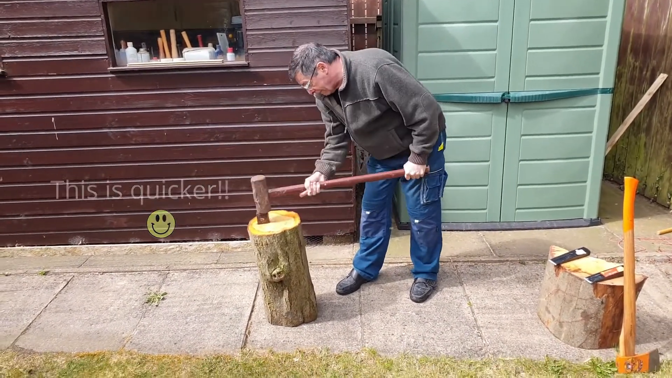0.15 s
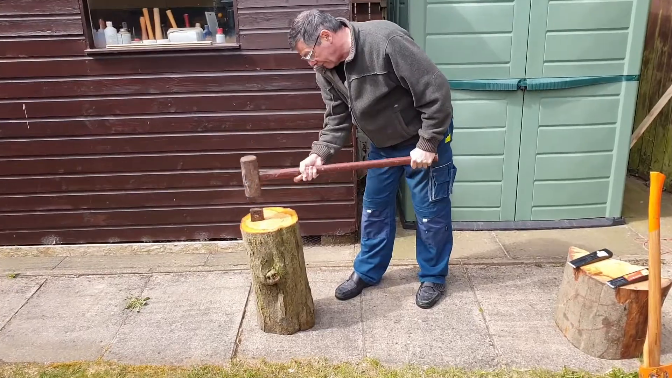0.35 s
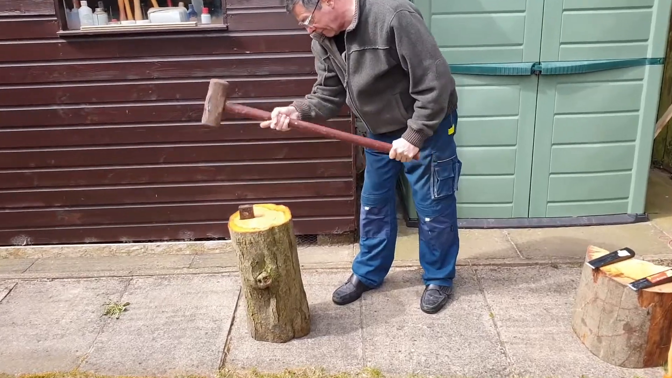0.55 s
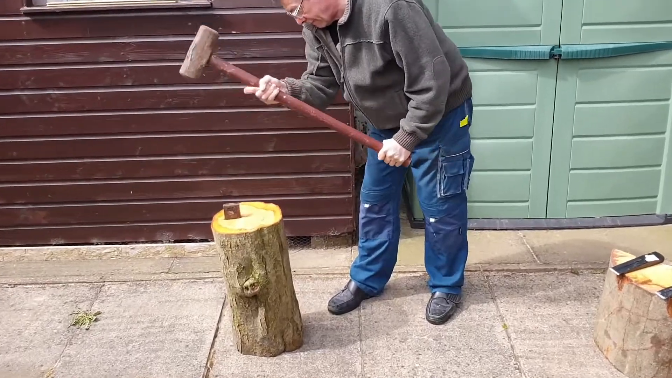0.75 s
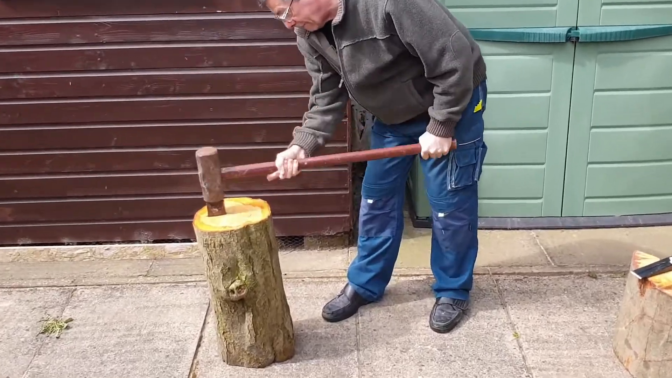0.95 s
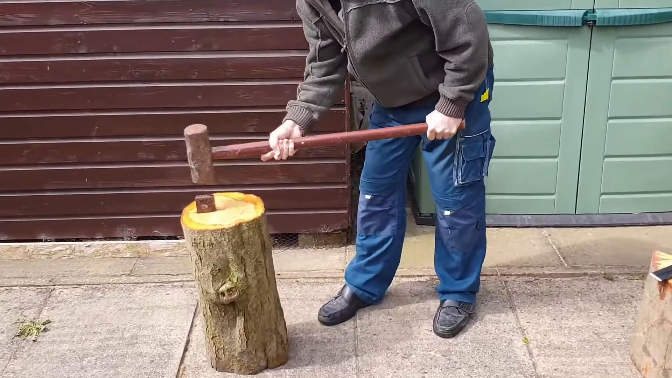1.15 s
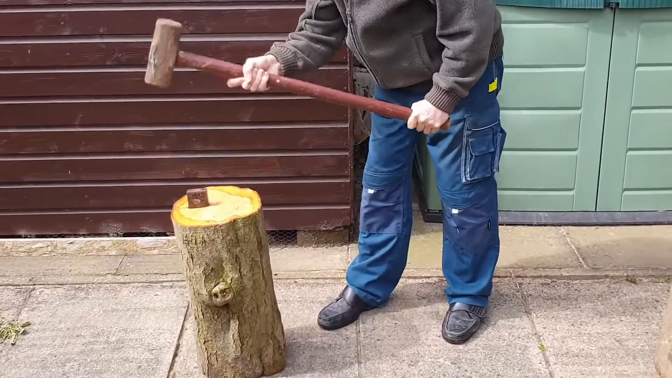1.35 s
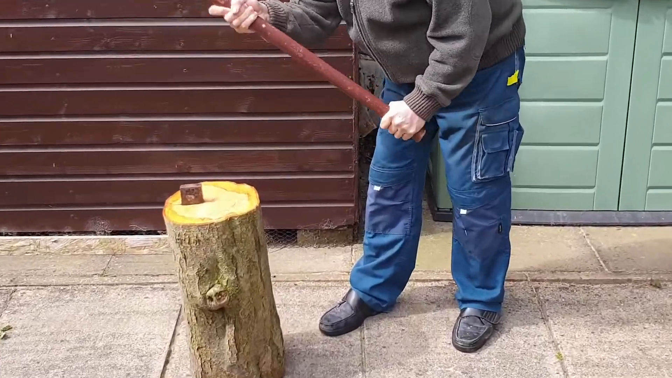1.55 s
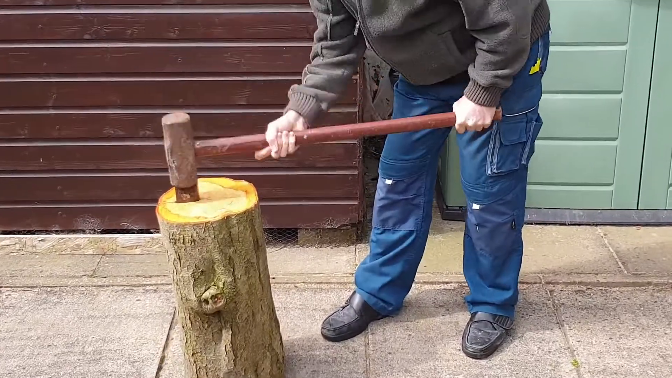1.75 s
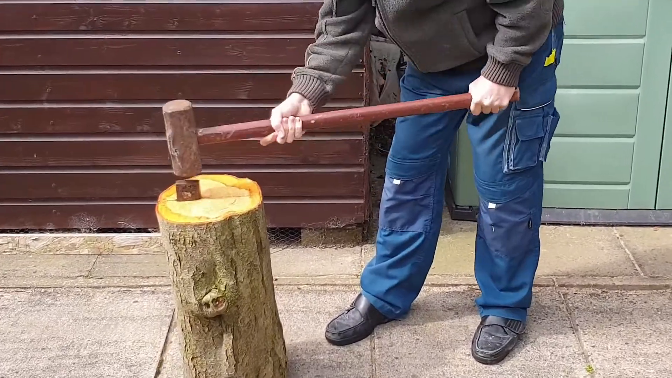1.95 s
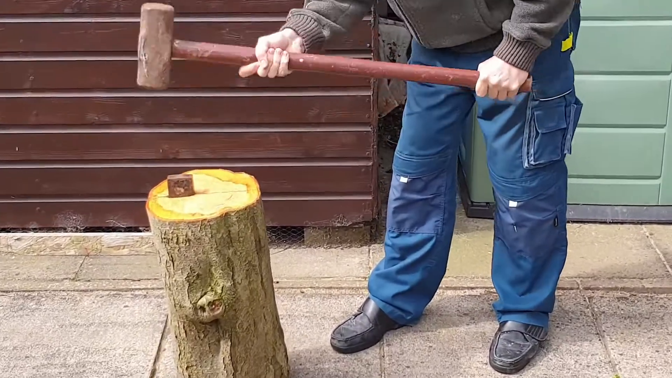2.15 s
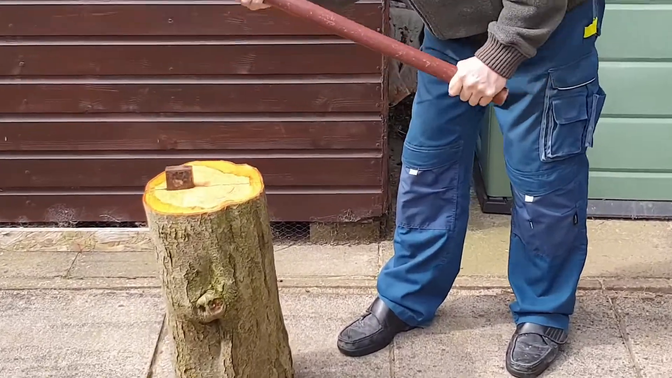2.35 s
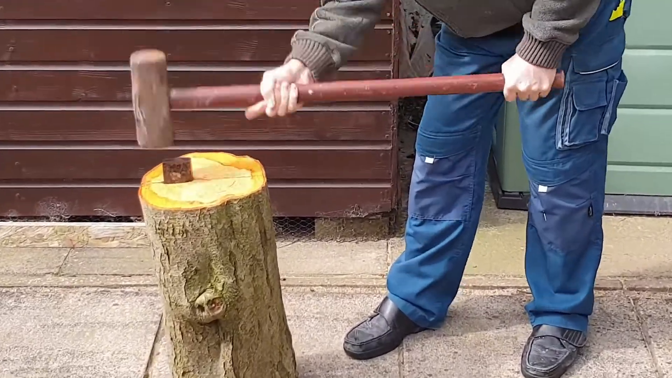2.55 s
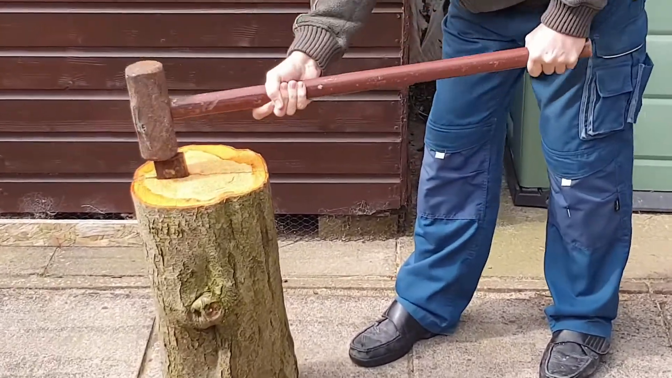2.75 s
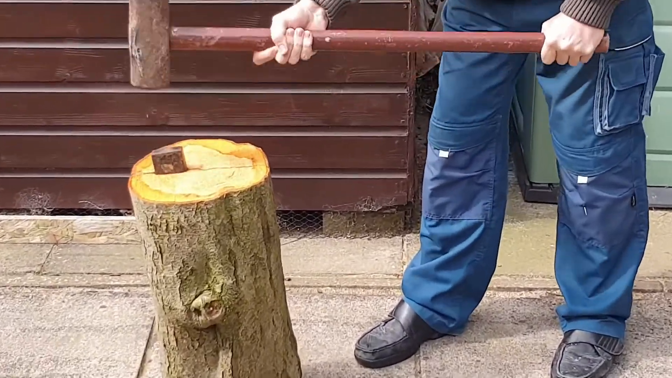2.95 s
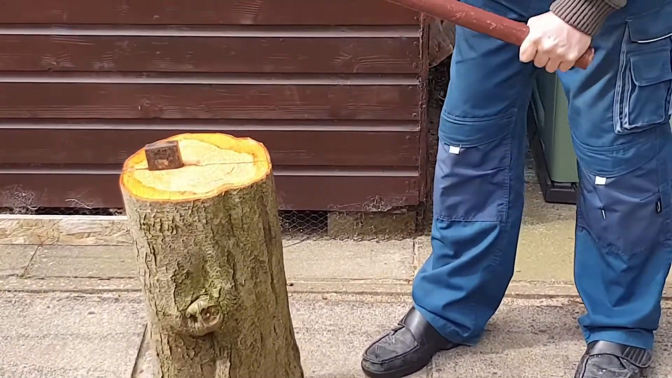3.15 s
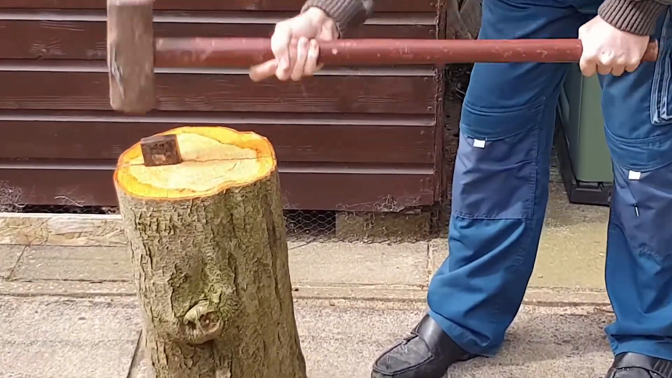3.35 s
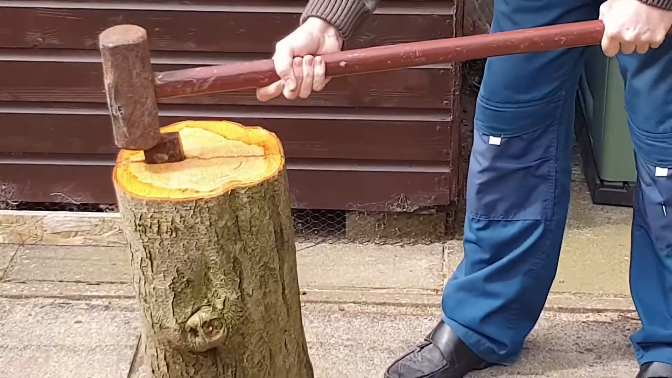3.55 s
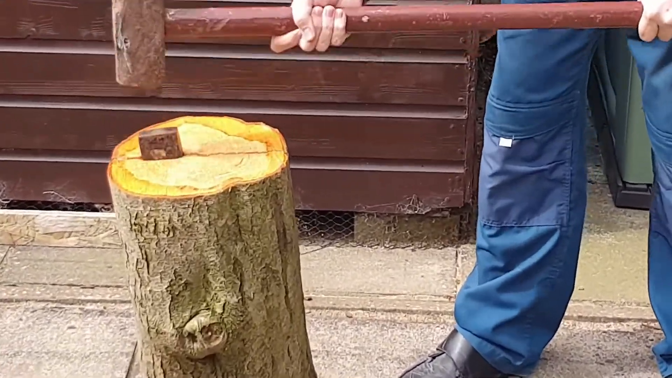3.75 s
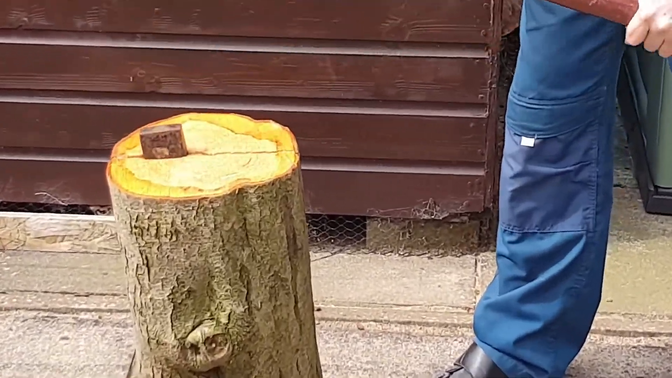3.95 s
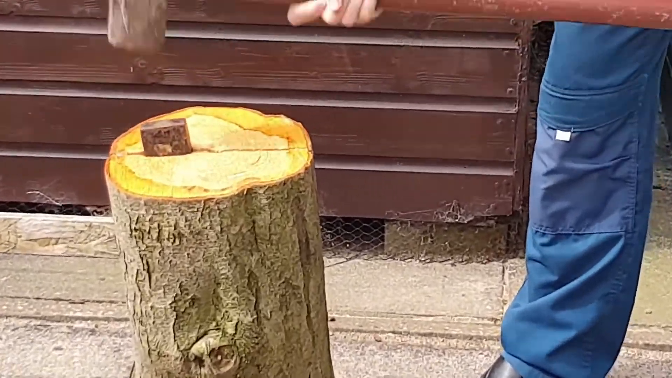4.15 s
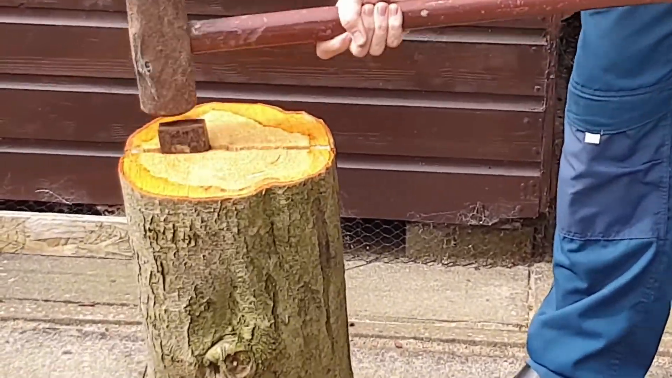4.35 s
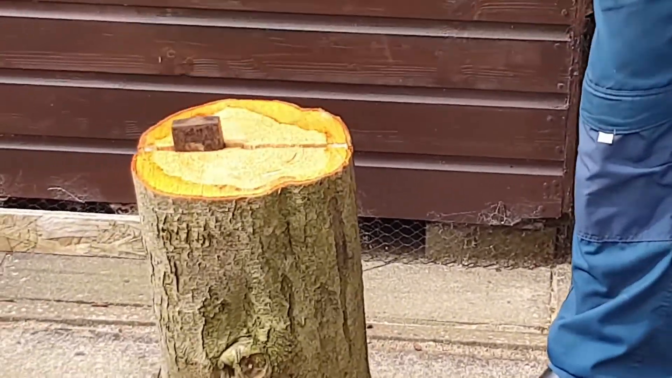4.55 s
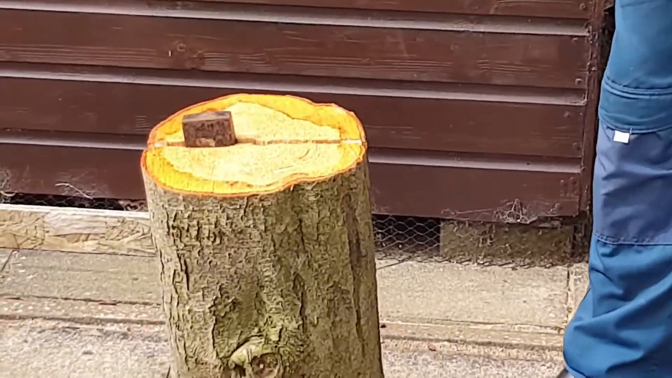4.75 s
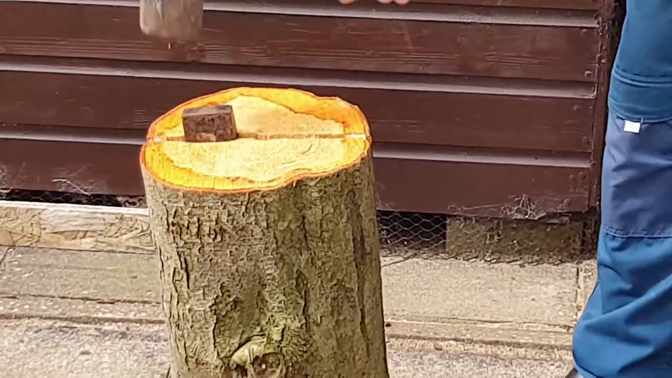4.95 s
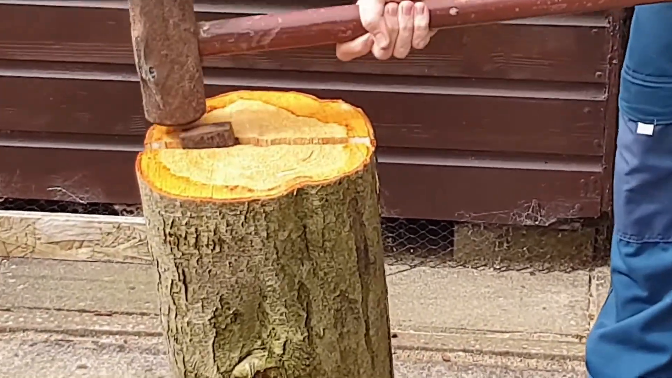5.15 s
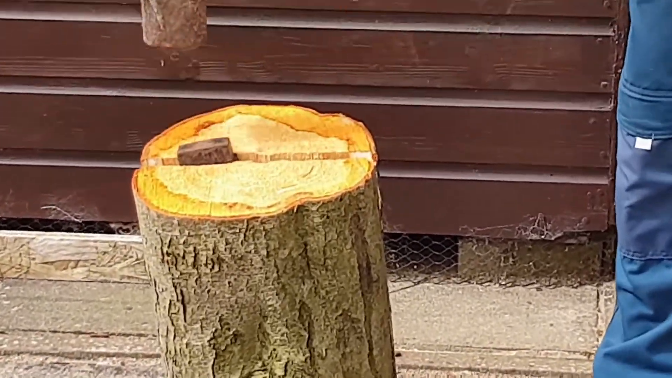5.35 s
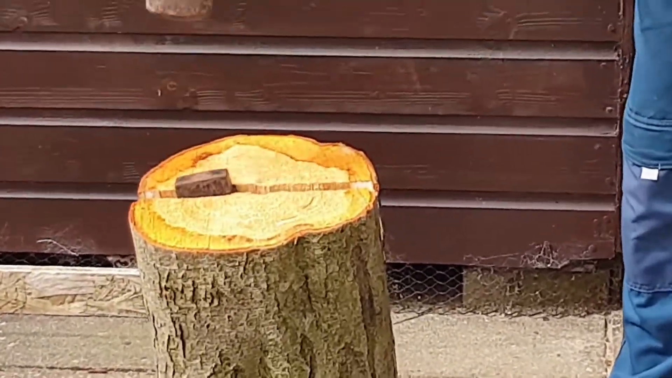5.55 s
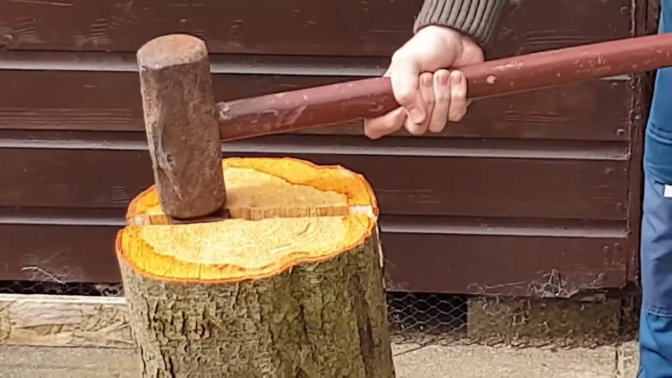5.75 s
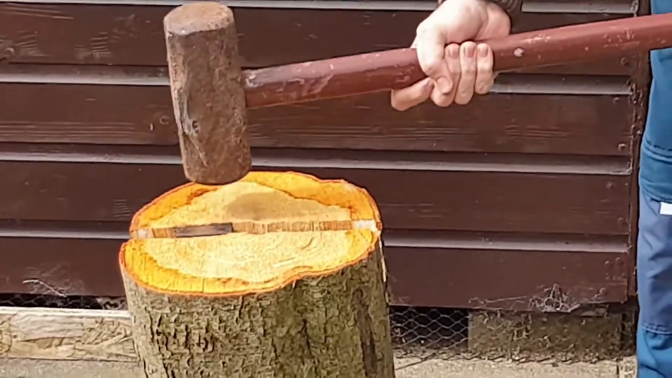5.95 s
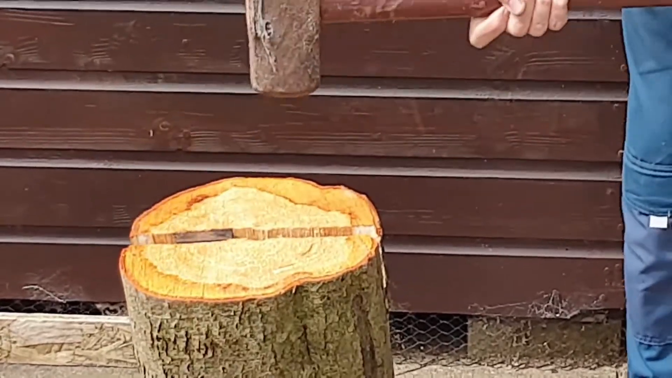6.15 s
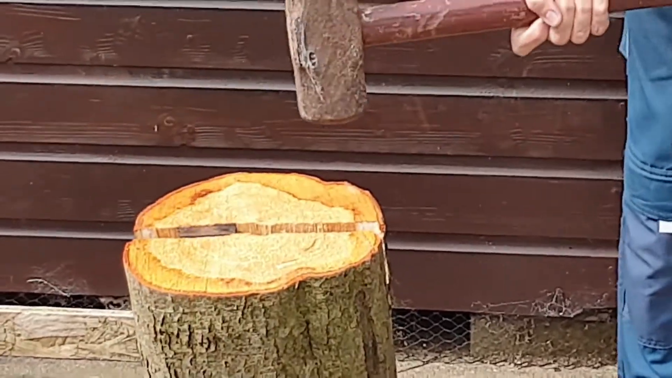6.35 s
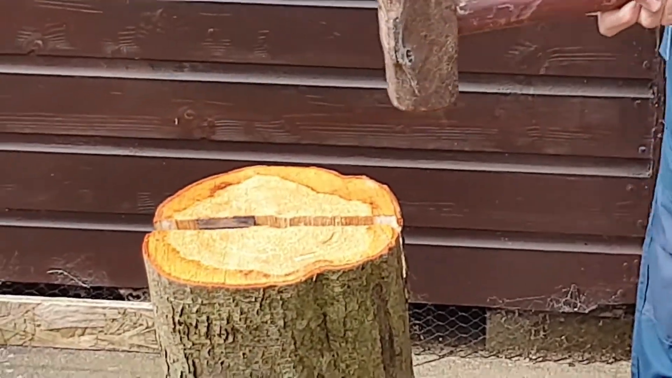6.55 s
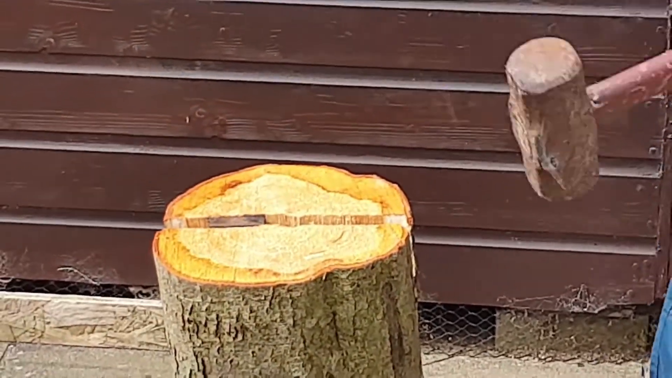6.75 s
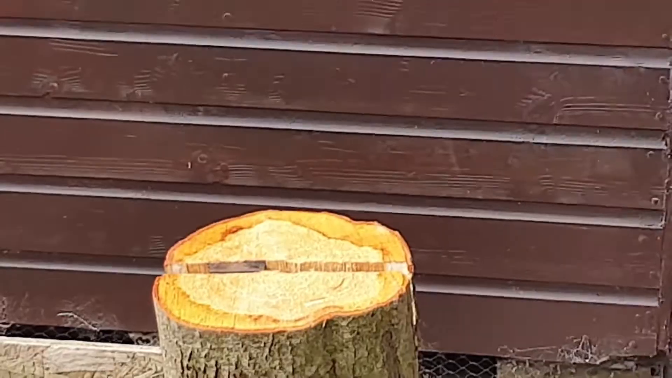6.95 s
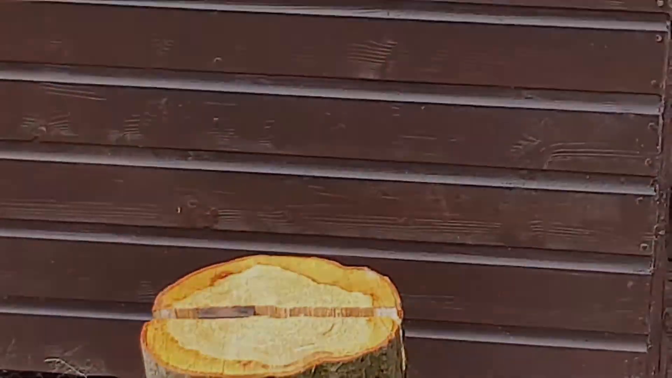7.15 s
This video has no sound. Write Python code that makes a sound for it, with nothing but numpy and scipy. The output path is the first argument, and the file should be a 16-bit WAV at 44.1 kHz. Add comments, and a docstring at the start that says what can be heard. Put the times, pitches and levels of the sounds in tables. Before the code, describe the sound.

A sledgehammer strikes a steel wedge in an upright log eight times in a paved yard, slightly to the left, at about 0.2, 1.0, 1.9, 2.7, 3.5, 4.3, 5.1 and 5.8 seconds. Each blow is a loud, sharp metallic crack with a wooden thump, a brief high ring and a quick slap off nearby walls. Tiny snaps of wood fibre come between blows from about 3.8 seconds, with a clearer snap at 5.3 as the log splits. The last two blows have less thump, and the loosened wedge rings more brightly. Wind is light at first, then buffets the microphone with low rumbling gusts from about 5.5 seconds to the end. Shoes scuff softly on gritty slabs from about 6.5 seconds until the end, just after 7. Very faint, thin bird whistles come and go in the distance throughout.

```python
"""Splitting a log with a sledgehammer

A sledgehammer drives a steel wedge into an upright log in a paved yard, eight blows. Each blow cracks,
thumps the log and rings the steel; shed walls slap it back. On the last two the log splits and the
loosened wedge rings freely. Wind buffets the microphone, far birds call and shoes scuff."""
import sys
import numpy as np
from scipy import signal
from scipy.fft import rfft, irfft, next_fast_len
from scipy.io import wavfile
from scipy.ndimage import uniform_filter1d

SR = 44100
rng = np.random.default_rng(int(sys.argv[2]) if len(sys.argv) > 2 else 0)


def put_to_file(sound):
    """Save the sound as 16-bit audio at rate SR, in the file named by the first command-line argument."""
    columns = np.atleast_2d(sound).T  # one column per channel
    safe = np.clip(columns, -1, 1)
    whole_steps = np.round(safe * 32767)
    wavfile.write(sys.argv[1], SR, whole_steps.astype(np.int16))


N = 321038
T = np.arange(SR) / SR  # one second: the life of one blow

# The tone of a crack, for blows and snapping wood. Each row: frequency in Hz, gain in dB.
CRACK_TONE = [(240, -31.5), (400, 2.5), (600, -0.5), (760, -3), (1060, -8.5), (1900, -6), (2090, -5),
              (3160, -6), (3810, -4.5), (7510, -9.5), (8900, -13.5), (11400, -11), (12100, -5.5),
              (12900, -10), (15100, -11), (16100, -32)]


def amp(db):
    """Turns decibels into a number to multiply by."""
    return 10 ** (np.asarray(db) / 20)


def unit(x):
    """Scales a signal to an average (rms) level of 1."""
    return x / np.sqrt(np.mean(x ** 2) + 1e-20)


def read(points, hz):
    """Reads between the rows of a table, spacing frequencies by octaves."""
    f, value = np.transpose(points)
    return np.interp(np.log(hz + 1), np.log(f + 1), value)


def add(mix, s, sound):
    """Mixes a stereo sound in, starting at s seconds."""
    part = mix[:, max(round(s * SR), 0):][:, :sound.shape[1]]
    part += sound[:, :part.shape[1]]


def colour(x, db_at):
    """Changes the tone by db_at(hz) decibels, without smearing sound back in time."""
    hz = abs(np.fft.fftfreq(4096, 1 / SR))
    log_gain = np.log(amp(np.maximum(db_at(hz), -100)))
    response = np.exp(np.conj(signal.hilbert(log_gain)))
    taps = np.fft.ifft(response).real[:2048]
    return signal.fftconvolve(x, taps[None], axes=1)[:, :x.shape[1]]


def noise(n, spectrum=None):
    """Stereo noise, partly alike in both ears in the bass."""
    # Each row: frequency in Hz, how alike the ears are from 0 to 1.
    likeness = [(60, 0.41), (300, .65), (700, 0), (1300, 0), (6000, 0.11), (13000, 0.32)]
    size = next_fast_len(n)
    hz = np.fft.rfftfreq(size, 1 / SR)
    left, other = rfft(rng.standard_normal((2, size)))
    same = np.clip(read(likeness, hz), -1, 1)
    right = same * left + np.sqrt(1 - same ** 2) * other
    gain = amp(read(spectrum, hz)) if spectrum else 1
    return unit(irfft(np.array([left, right]) * gain, size)[:, :n])


def swell(s, half_s, db):
    """A smooth rise and fall in level, peaking at s seconds."""
    return amp(db) * np.exp(-((np.arange(N) / SR - s) / half_s) ** 2)


def wander(per_s):
    """A random curve that takes a new turn per_s times a second."""
    knots = np.arange(0, N, SR / per_s)
    return np.interp(np.arange(N), knots, rng.standard_normal(len(knots)))


def air():
    """The faint, slowly shifting hush of the gardens."""
    # Each row: frequency in Hz, relative level in dB.
    hush_tone = [(59, -29.5), (100, -5), (177, -18), (461, -13.5), (1230, -22), (3940, -23), (5770, -26),
                 (7610, -19), (9210, -32), (13200, -28), (16000, -31)]
    return amp(-78 + 1.5 * wander(per_s=8)) * noise(N, hush_tone)


def wind():
    """Air swirls at the microphone; strong gusts flutter higher up and hit the right side harder."""
    # The light wind. Each row: time in seconds, level in dB.
    light_wind = [(0, -63), (.6, -68), (.78, -82.5), (.95, -66.5), (1.35, -67.5), (1.68, -79.5),
                  (2.301, -63.5), (2.619, -71.5), (2.95, -50.5), (3.3, -57.5), (3.432, -71.5),
                  (3.851, -60.5), (4.7, -55), (4.9, -82.5), (5.401, -51), (6.4, -42.5), (6.7, -60),
                  (7.28, -46)]
    # Gusts on top. Each row: peak time and half length in seconds, level in dB, relative flutter in dB.
    gusts = [(1.433, .025, -66, -28), (1.542, 0.016, -68, -32), (2.234, 0.027, -51.5, -35),
             (2.321, .035, -56, -28), (3.292, 0.042, -53.5, -34), (3.731, 0.018, -40, -35),
             (3.803, 0.019, -46.5, -35), (4.224, 0.031, -56, -32), (5.44, 0.027, -43.5, -18),
             (5.529, 0.018, -23.5, -29.5), (5.593, 0.04, -31.5, -25), (5.809, .03, -41.5, -42),
             (6.021, .035, -50, -33), (6.186, 0.033, -31.5, -20), (6.293, 0.034, -37.5, -25),
             (6.374, 0.042, -44.5, -16.5), (6.616, 0.014, -46, -42), (6.824, 0.057, -48, -24),
             (7.058, 0.066, -41.5, -20), (7.17, 0.021, -35.5, -10.5), (7.212, 0.016, -35, -11.5),
             (7.256, 0.024, -32.5, -7)]
    # The wind's three tones. Each row: frequency in Hz, relative level in dB.
    breeze_tone = [(12, -38.5), (20, -8), (60, 3), (87, -4), (143, -11.5), (295, -26.5), (338, -23),
                   (718, -45), (1200, -55), (1560, -84), (2640, -120)]
    buffet_tone = [(12, -17.5), (20, -24), (48, -1), (92, 1), (130, -6.5), (280, -14.5), (376, -16),
                   (412, -16.5), (842, -44), (1600, -89.5), (2080, -81), (3520, -120)]
    flutter_tone = [(200, -31), (330, -2), (450, 1.5), (600, 1), (850, -20), (1300, -37.5), (2500, -53),
                    (5000, -76.5)]
    light_db = np.interp(np.arange(N) / SR, *np.transpose(light_wind)) + 3.1 * wander(per_s=20)
    level = amp(light_db) + sum(swell(s, half_s, db) for s, half_s, db, _ in gusts)
    strong_from_db, strong_range_db = -51.5, 15.5  # where breeze turns into buffeting
    strong = np.clip((20 * np.log10(level) - strong_from_db) / strong_range_db, 0, 1)
    buffet = noise(N, buffet_tone)
    swirls = level * (np.sqrt(1 - strong) * noise(N, breeze_tone) + np.sqrt(strong) * buffet)
    swirls = colour(swirls, lambda hz: read([(20, -3), (45, 1.5), (280, 1.5), (500, -2.5)], hz))
    flutter = sum(swell(s, half_s, db + flutter_db) for s, half_s, db, flutter_db in gusts)
    flutter = flutter * unit(noise(N, flutter_tone) * (0.35 + abs(buffet)))  # big swirls shed small ones
    return (swirls + flutter) * amp(strong * np.array([[-2.5], [2.1]]))


def birds():
    """Thin gliding whistles that pulse quickly, blurred by distance."""
    # Each row: start and length in seconds, first pitch, last pitch and blur width in Hz, level in dB.
    calls = [(0, 0.26, 3650, 3600, 334, -74), (0.022, .13, 7000, 7500, 600, -80),
             (0.697, .32, 6410, 5600, 698, -75), (1.537, 0.24, 7800, 8100, 700, -80),
             (2.133, 0.071, 6400, 6600, 80, -66), (2.378, 0.37, 6796, 7400, 896, -75.5),
             (2.439, 0.12, 3600, 4900, 250, -83), (2.938, 0.22, 6470, 6400, 39.9, -73.5),
             (3.184, .14, 4600, 4400, 90.4, -77), (5.01, 0.077, 5180, 5090, 150, -78.5),
             (5.54, 0.36, 6060, 4640, 712, -75.5), (6.154, 0.56, 5040, 5260, 802, -75.5)]
    out = np.zeros((2, N))
    for s, length, start_hz, end_hz, width_hz, db in calls:
        n = round(length * SR)
        hiss = rng.standard_normal((2, n)) + 1j * rng.standard_normal((2, n))
        blur = signal.sosfilt(signal.butter(2, width_hz / 2, fs=SR, output="sos"), hiss)
        trill = np.sin(2 * np.pi * (rng.uniform(6.6, 9) * np.arange(n) / SR + rng.random()))
        pitch = np.linspace(start_hz, end_hz, n) + .15 * width_hz * trill
        call = (blur * np.exp(2j * np.pi * np.cumsum(pitch) / SR)).real * amp(1.8 * trill)
        add(out, s, amp(db) * unit(call) * signal.windows.tukey(n, .8))
    return out


def hammering():
    """The eight blows and the snapping wood; the log stands a little to the left."""
    # Each row: start in seconds; relative levels in dB of the thump, knock, crack, fizz, yard tail,
    # hammer ring, off-centre ring, loose wedge, hollow wood ring and drop back; low and high clang in Hz.
    blows = [(0.1902, 0, 0, 1.5, -3.5, 1, -16.5, -56, -61, -21.5, -18, 2274, 4097),
             (1.0263, 0, -3.5, 1, 0.5, 3, -13, -53, -59, -34, -20, 1726, 5560),
             (1.8690, 0.5, -1.5, 0, -1, 3.5, -19, -38.5, -53.5, -42, -21, 1498, 6680),
             (2.6792, -1, -1.5, 0.5, -1.5, -0.5, -18.5, -41.5, -58, -52, -24, 1520, 6530),
             (3.4882, -0.5, -1, 0, 0, 1.5, -23, -24, -49.5, -44.5, -24.5, 1964, 6390),
             (4.301, 1, 2, -0.5, -1.5, 0, -15.5, -45, -57.5, -18.5, -27, 1396, 5980),
             (5.0994, -4.5, 1, -3, -4.5, 0.5, -17.5, -26.5, -32.5, -20.5, -28.5, 2170, 4700),
             (5.828, -7.5, -2.5, -3.5, -5, -1.5, -42.5, -28, -38.5, -16.5, -45, 2330, 3860)]
    # Each row: frequency in Hz, how much louder the left ear is in dB.
    left_lift = [(60, -2), (150, 0.04), (300, 1.04), (700, 1.5), (1500, 3.5), (3000, -0.5), (8000, 2),
                 (13000, -1.5)]
    out = np.zeros((2, N))
    for s, *settings in blows:
        add(out, s, blow(*settings))
    out += snaps()
    left = colour(out[:1], lambda hz: .5 * read(left_lift, hz))
    right = colour(out[1:], lambda hz: -.5 * read(left_lift, hz))
    return np.vstack([left, right])


def blow(thump_db, knock_db, crack_db, fizz_db, tail_db, head_db, off_db, wedge_db, hollow_db, drop_db,
         low_hz, high_hz):
    """Steel meets steel: a tick, a clanging crack, the log's thump and the ring of the metal."""
    # The notes each part rings at. Each row: pitch in Hz, relative level in dB, seconds to fade 60 dB.
    log_notes = [(68.7, -5, 0.27), (97.64, -2, 0.35), (118.6, -6, 0.26), (147.4, -15, 0.5), (173, -12, 0.1),
                 (237, -1.5, 0.23), (251.6, -6.5, 0.2), (315.2, -2, 0.12), (345.4, 2, 0.19),
                 (397, -10, 0.083), (425, -16, 0.16)]
    hollow_wood_notes = [(117, -4.5, 0.083), (346.3, -0.5, .15), (437, -8.5, 0.1), (589, -8, 0.097),
                         (671, 2, 0.12), (745, -6, 0.074), (1430, -13.5, 0.064), (2370, -7, 0.08)]  # the log's higher, hollow knock, stronger on some blows
    loose_wedge_notes = [(1429, 0, .22), (2125, -1, .24), (2870, -2, .2), (3835, -2.5, .26),
                         (3886, -4, .29), (3935, -6, .25), (4703, 2, .22), (7000, -3, .2), (7531, -3, .17),
                         (7705, -9, .2), (7750, -6, .24)]
    hammer_notes = [(12010, 0, .19)]
    off_centre_hammer_notes = [(11375, -2, .17), (14272, 0, .25), (14860, -5, .15)]
    # This blow's own tone. Each row: frequency in Hz, gain in dB.
    tone = [(25, thump_db - 13.5), (70, thump_db), (300, thump_db + 1.5), (700, knock_db),
            (1500, knock_db), (2800, crack_db), (7000, crack_db), (9500, fizz_db)]
    burst = impact(tail_db, burst_s=.0035)
    crack = amp(-4) * colour(burst, lambda hz: read(CRACK_TONE, np.maximum(hz, 450)) + read(tone, hz))
    crack += amp(wedge_db) * ring(loose_wedge_notes, rise_s=.002, spread=1.2, waver=.5)
    loose = np.interp(wedge_db, [-52, -38], [0, 1])  # 0 is gripped by the wood, 1 is free
    clang = colour(crack, lambda hz: wedge_colour(loose, low_hz, high_hz, hz))
    tick = noise(SR) * (T / 0.0021) * np.exp(-T / 0.00032)
    tick = colour(tick, lambda hz: read([(2000, -16.5), (8000, -6), (14000, 0)], hz))
    wood = amp(thump_db - 21) * ring(log_notes, rise_s=0.00033, spread=0.14, waver=0.25)
    wood += amp(hollow_db) * ring(hollow_wood_notes, rise_s=0.0031, spread=0.23, waver=0.13)
    head = amp(head_db) * ring(hammer_notes, rise_s=.009, spread=1.2, waver=.5)
    head += amp(off_db) * ring(off_centre_hammer_notes, rise_s=.001, spread=1.3, waver=.3)
    return clang + tick + wood + head + amp(drop_db) * drop_back()


def impact(tail_db, burst_s):
    """A very short burst of noise, its slaps off slabs, shed and fences, and its tail."""
    # Each row: delay in seconds, relative level in dB, the left ear's head start in seconds.
    echoes = [(0, 1, .00012), (.0028, -1, -.0002), (0.0088, -10.5, .0003), (0.0143, -5, -.0001),
              (0.0314, -9, .0004), (0.0341, -7.5, 0.014), (.165, -37.5, .0002)]
    out = amp(tail_db) * yard_tail(near_db=-2, far_db=-22, build_s=0.0071)
    for delay, db, lead in echoes:
        # Rough walls scramble each slap, so each gets fresh noise.
        left = amp(db + 3.5) * rng.standard_normal(SR) * np.exp(-T / burst_s)
        right = np.interp(T - lead, T, left, left=0)
        add(out, delay, np.array([left, right]))
    return out


def yard_tail(near_db, far_db, build_s):
    """Scattered sound fades unevenly: fast between the walls, slowly in the gardens beyond."""
    # Each row: frequency in Hz, seconds to fade 60 dB.
    wall_fade = [(100, .3), (700, .2), (2000, .24), (5000, .27), (10000, .22), (15000, .18)]
    garden_fade = [(100, .8), (700, .58), (2000, .62), (5000, .6), (9000, .41), (15000, .3)]
    hz, t, bands = signal.stft(noise(SR), SR, nperseg=256)
    near = amp(near_db - 60 * t / read(wall_fade, hz)[:, None])
    far = amp(far_db - 60 * t / read(garden_fade, hz)[:, None])
    patches = uniform_filter1d(rng.standard_normal(bands.shape), size=4, axis=1)  # smooth over time
    patches = unit(uniform_filter1d(patches, size=22, axis=0))  # and over frequency
    lumps = amp(2.3 * patches * np.minimum(t / .05, 1))
    _, tail = signal.istft(bands * np.hypot(near, far) * lumps, SR, nperseg=256)
    return tail[:, :SR] * (1 - np.exp(-T / build_s))


def ring(notes, rise_s, spread, waver):
    """A struck object's fading notes; echoes make each waver and reach the ears out of step."""
    out = np.zeros((2, SR))
    knots = np.arange(0, 1, .02)
    for k, (hz, db, fade_s) in enumerate(notes):
        phase = k * np.pi + spread * np.array([[.5], [-.5]]) * rng.choice([-1, 1])
        drift = np.array([np.interp(T, knots, row) for row in rng.standard_normal((2, len(knots)))])
        out += amp(db - 60 * T / fade_s) * (1 + waver * drift) * np.sin(2 * np.pi * hz * T + phase)
    return out * (1 - np.exp(-T / rise_s))


def wedge_colour(loose, low_hz, high_hz, hz):
    """The wedge's boost in dB: a few main pitches over many lesser ones that change with each blow."""
    # The wedge gripped by the wood, and loose in the split. Each row: pitch in Hz, boost in dB.
    gripped_peaks = [(1500, 2.5), (1900, 2.5), (2500, 0), (3120, -1.5), (3800, 2), (4800, 0.5), (5450, 1.5),
                     (6500, 1.5), (7150, 2), (7650, 3.5)]
    loose_peaks = [(1420, 3), (2900, 2), (3860, 14.7), (4700, 9), (7020, 11), (7530, 5.5), (7740, 17),
                   (8940, 9.9), (14900, 7.2)]

    def peaks(rows, half_width_hz=95):
        return sum(db / (1 + ((hz - centre_hz) / half_width_hz) ** 2) for centre_hz, db in rows)

    dip = -1.5 * np.clip(hz / 4000, 0, 1)  # a loose wedge leaves less energy between its peaks
    clangs = peaks([(low_hz, 6.5), (high_hz, 6.5)])  # these shift with the wood's grip as it sinks
    main = (1 - loose) * peaks(gripped_peaks) + loose * (peaks(loose_peaks) + dip) + clangs
    grid = np.arange(0, SR / 2, 55)
    lesser = np.interp(hz, grid, rng.standard_normal(len(grid))) * np.clip(hz / 1500, 0, 1) ** 2
    return main + 3.1 * lesser / (1 + abs(main) / 4) - .4


def drop_back(after_s=.059, hz=276, half_s=0.0056):
    """The log, jolted off the slab, lands again with a soft wooden knock."""
    t = T - after_s
    return np.exp(-(t / half_s) ** 2) * np.sin(2 * np.pi * hz * t)


def snaps():
    """Wood fibres give way in small snaps and knocks."""
    # Each row: start in seconds, relative level in dB, treble tilt in dB per octave.
    breaks = [(3.256, -69, 7), (3.782, -43.5, -1), (4.594, -49, 0), (4.692, -50.5, 3), (5.3298, -26, -0.5),
              (6.957, -50.5, -4), (7.17, -57, -4.5)]
    out = np.zeros((2, N))
    for s, db, tilt in breaks:
        snap = impact(tail_db=-5, burst_s=.003) + amp(4) * noise(SR) * np.exp(-T / .006)
        snap = colour(snap, lambda hz: read(CRACK_TONE, hz) + tilt * np.log2((hz + 200) / 4000))
        add(out, s, amp(db) * snap)
    return out


def scuffs():
    """Soles drag over gritty slabs as the worker steps back."""
    # Each row: peak time and half length in seconds, level in dB.
    drags = [(6.57, 0.2, -74), (6.824, 0.029, -59.5), (7.021, 0.031, -50), (7.15, 0.24, -64)]
    # Each row: frequency in Hz, relative level in dB.
    scuff_tone = [(410, -28), (700, -3), (852, -4.5), (1560, -9.5), (2880, -8), (8880, -15.5),
                  (11700, -11.5), (16000, -15.5)]
    grit = 1 + 0.25 * unit(uniform_filter1d(rng.standard_normal(N), size=90))
    return sum(swell(*row) for row in drags) * grit * noise(N, scuff_tone)


def scene():
    """The work, the weather and the quiet around them."""
    return hammering() + wind() + scuffs() + birds() + air()


def record(dry):
    """The microphone loses the deepest bass, rounds off loud peaks and cuts the highest treble."""
    bass_hz, ceiling, treble_hz = 24, 1.35, 16300
    thinned = signal.sosfilt(signal.butter(2, bass_hz, "highpass", fs=SR, output="sos"), dry)
    rounded = ceiling * np.tanh(thinned / ceiling)
    treble_cut = signal.firwin(255, treble_hz, window=("kaiser", 8), fs=SR)
    return signal.oaconvolve(rounded, treble_cut[None], "same")


dry = scene()
out = record(dry)
put_to_file(out)
```